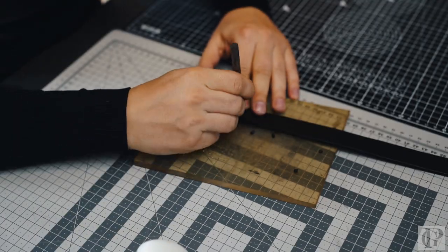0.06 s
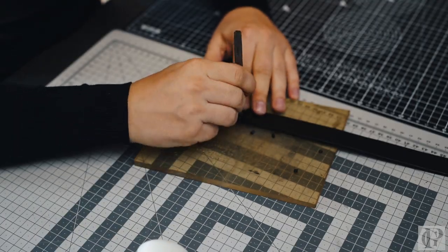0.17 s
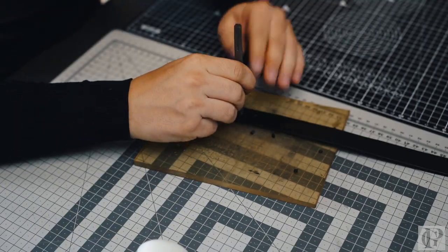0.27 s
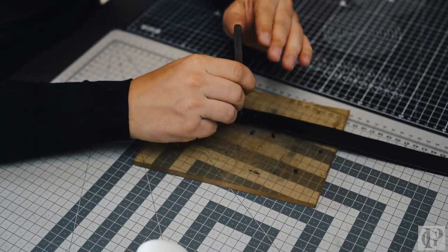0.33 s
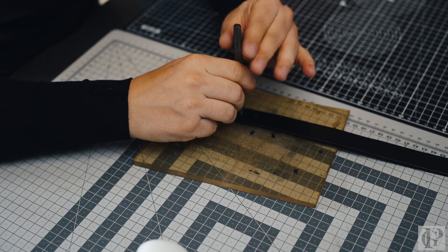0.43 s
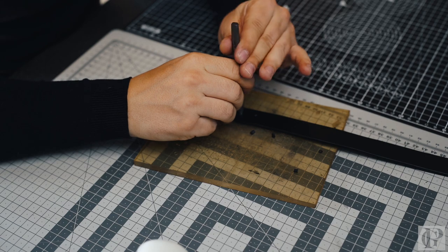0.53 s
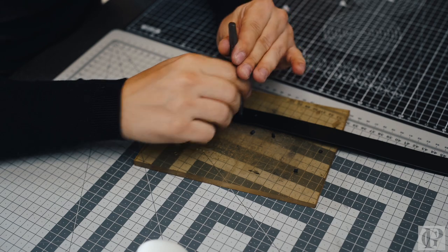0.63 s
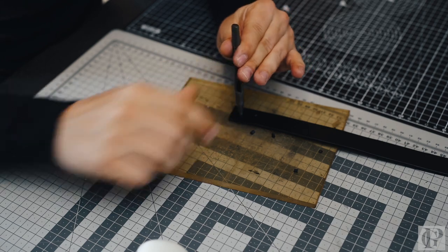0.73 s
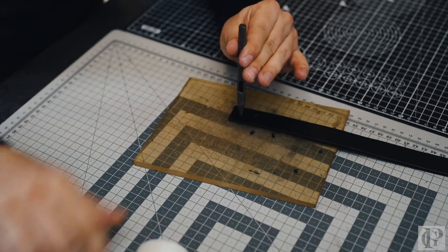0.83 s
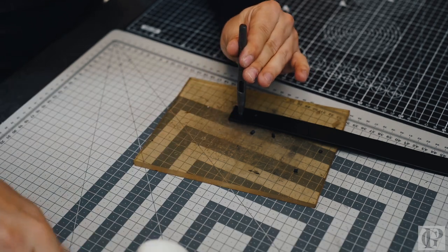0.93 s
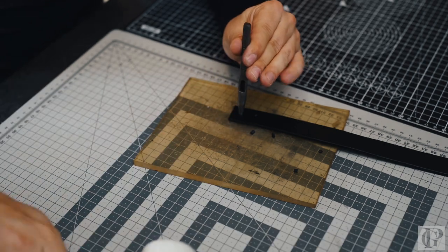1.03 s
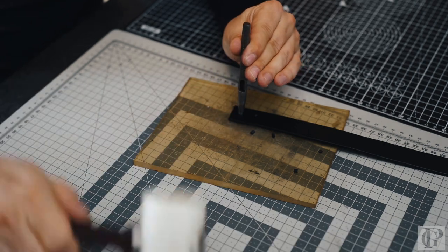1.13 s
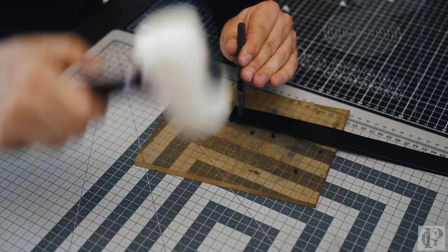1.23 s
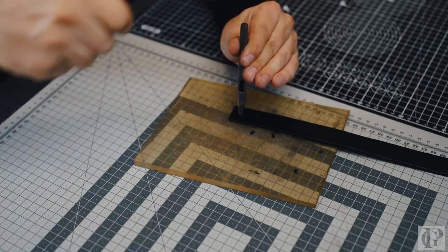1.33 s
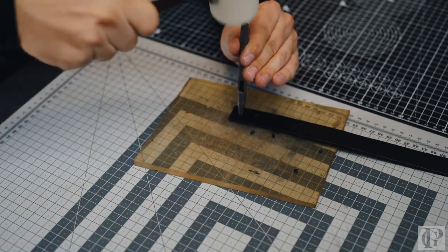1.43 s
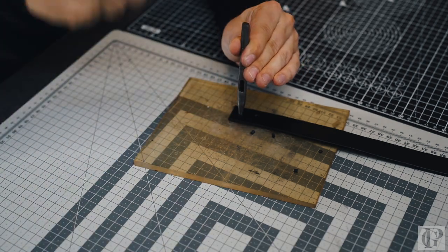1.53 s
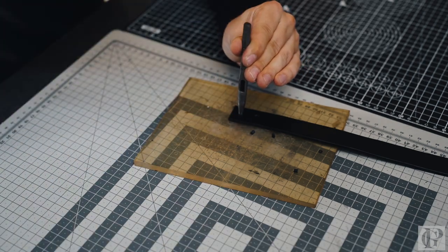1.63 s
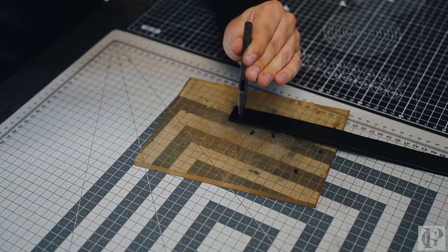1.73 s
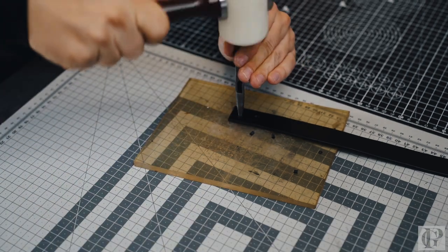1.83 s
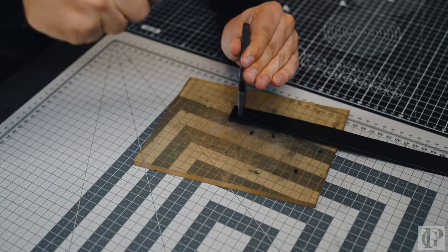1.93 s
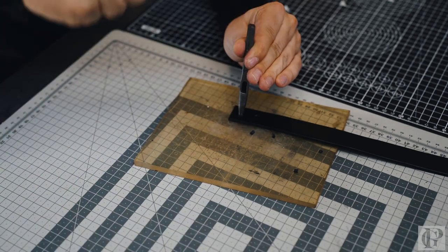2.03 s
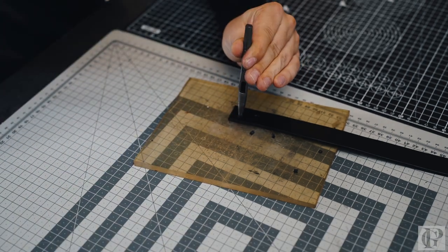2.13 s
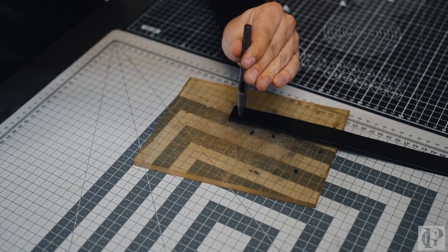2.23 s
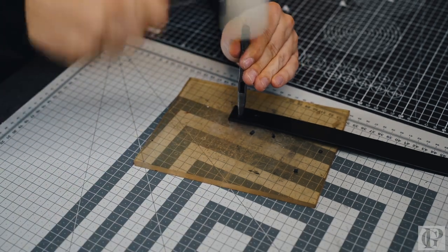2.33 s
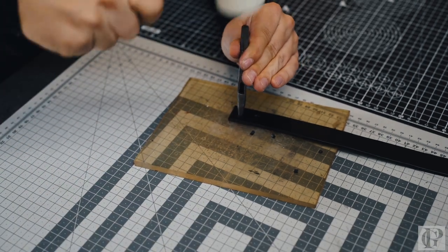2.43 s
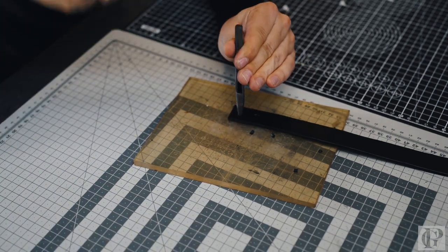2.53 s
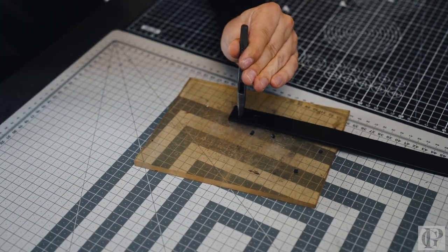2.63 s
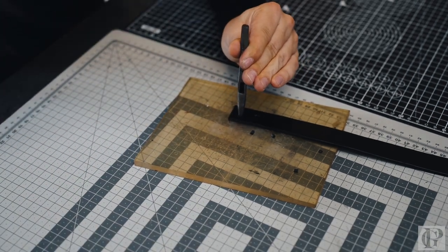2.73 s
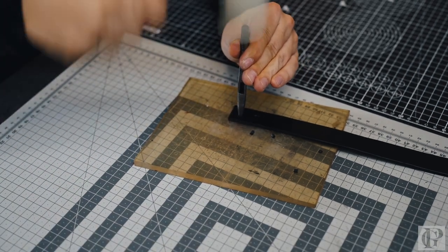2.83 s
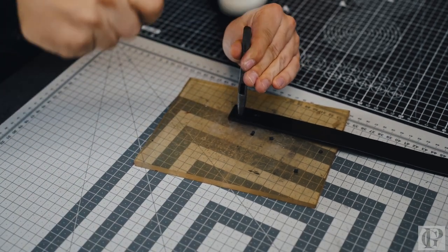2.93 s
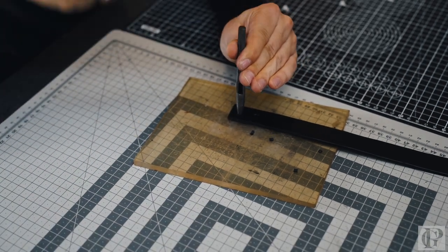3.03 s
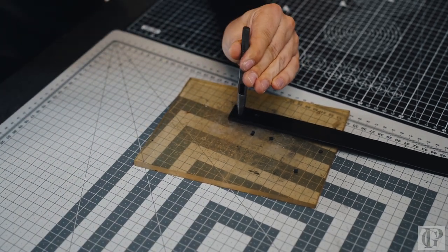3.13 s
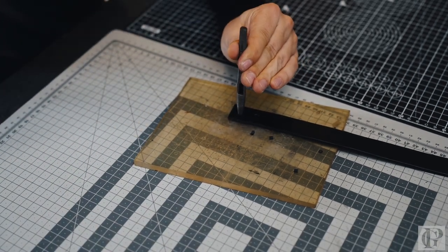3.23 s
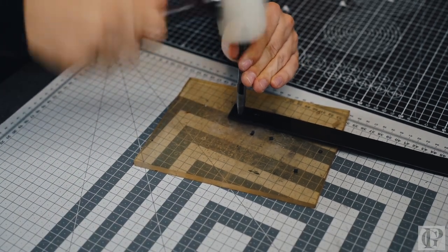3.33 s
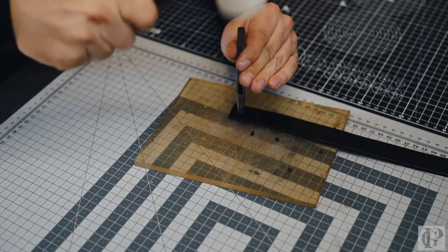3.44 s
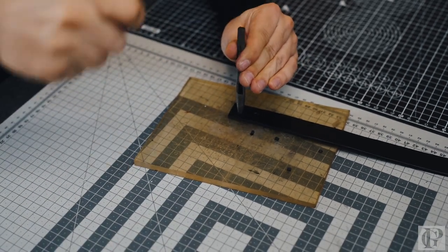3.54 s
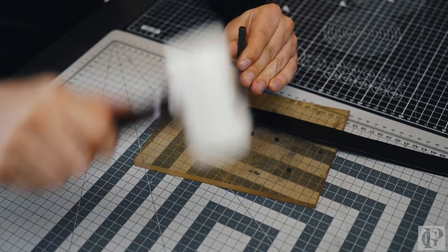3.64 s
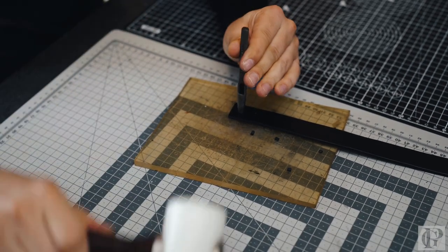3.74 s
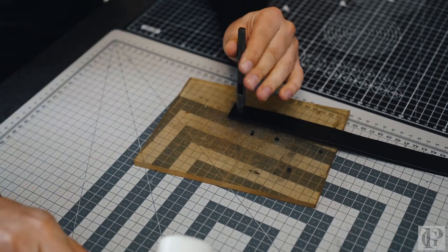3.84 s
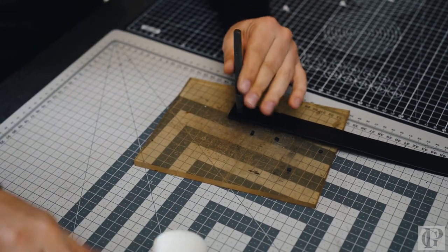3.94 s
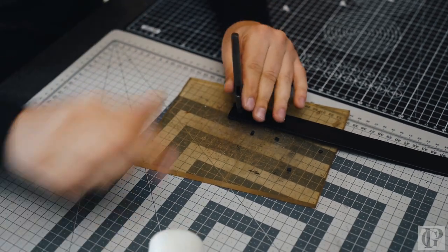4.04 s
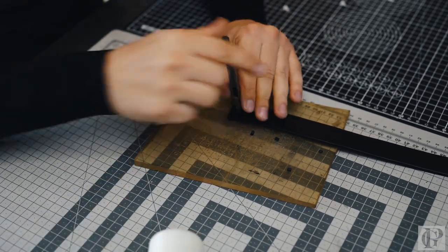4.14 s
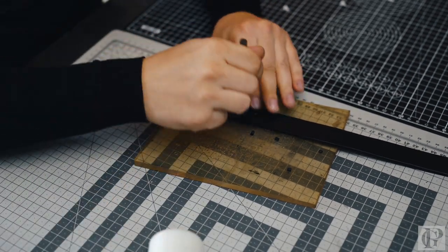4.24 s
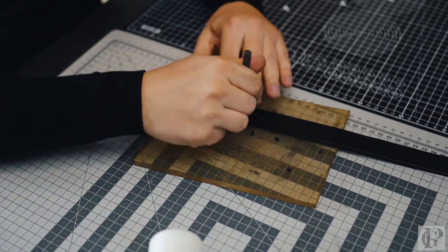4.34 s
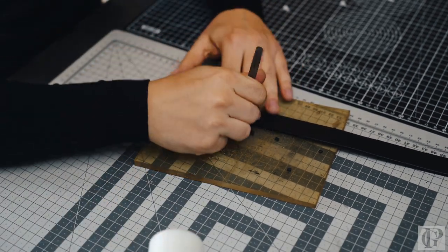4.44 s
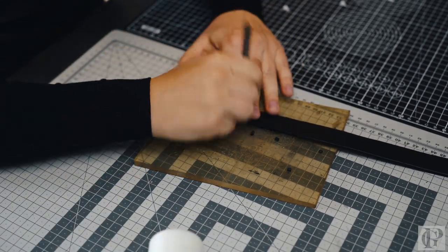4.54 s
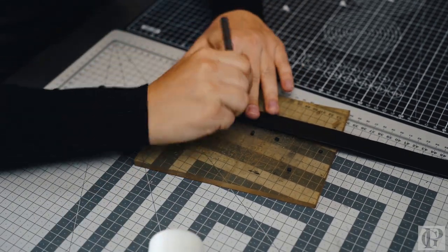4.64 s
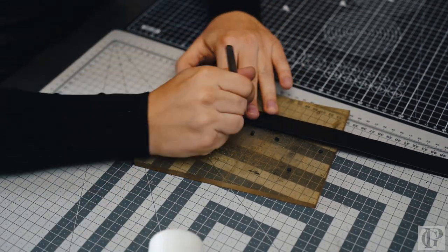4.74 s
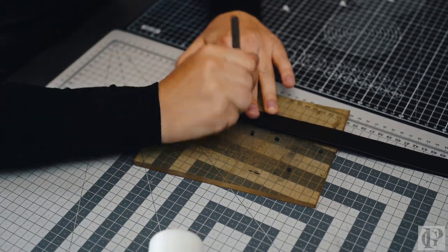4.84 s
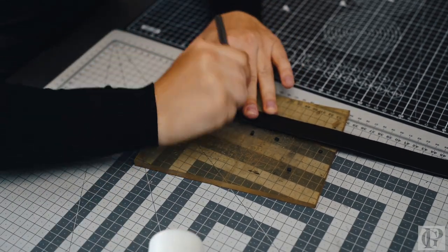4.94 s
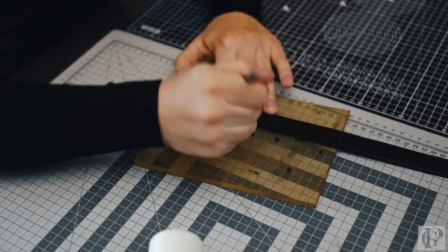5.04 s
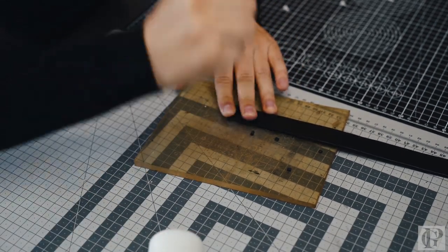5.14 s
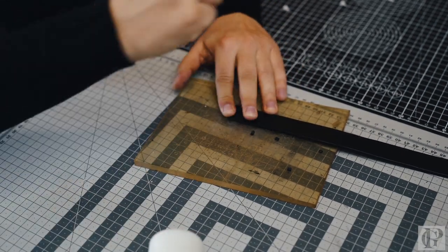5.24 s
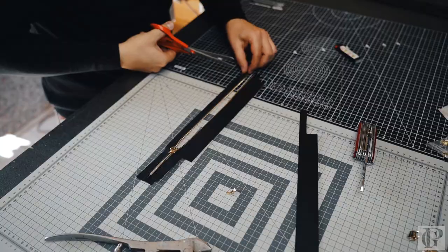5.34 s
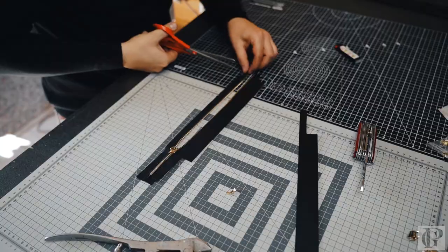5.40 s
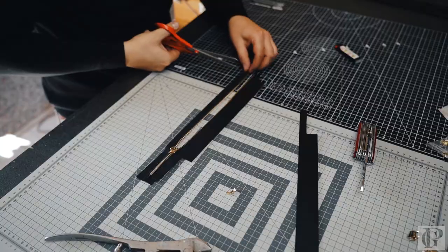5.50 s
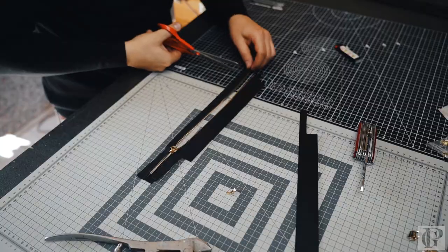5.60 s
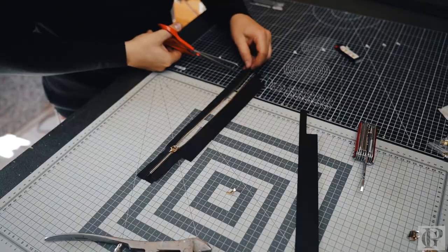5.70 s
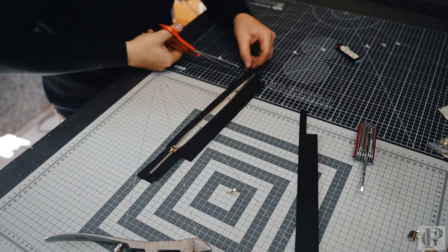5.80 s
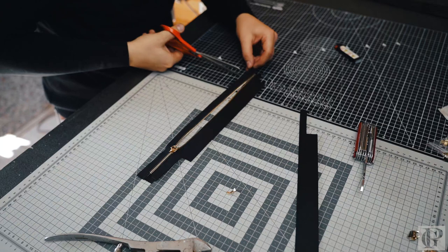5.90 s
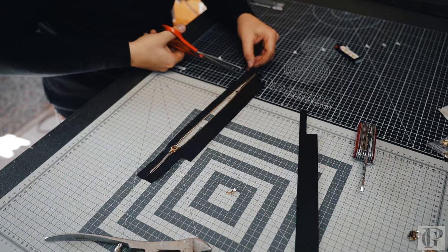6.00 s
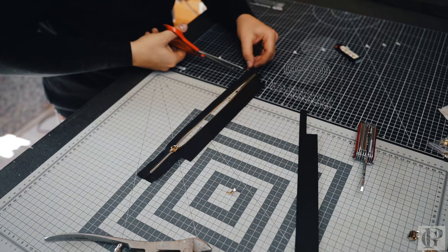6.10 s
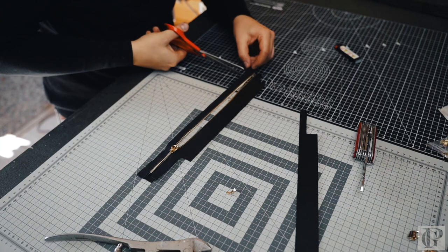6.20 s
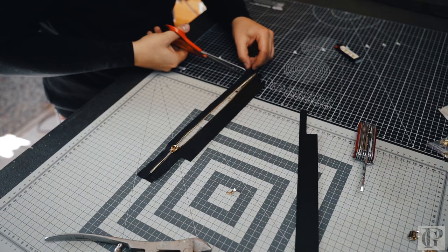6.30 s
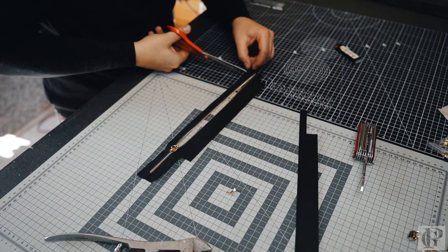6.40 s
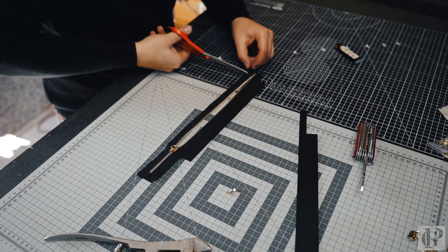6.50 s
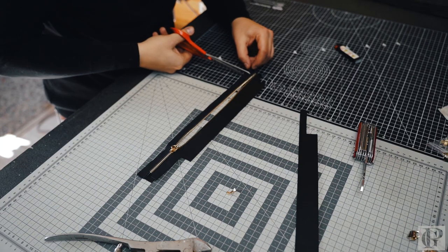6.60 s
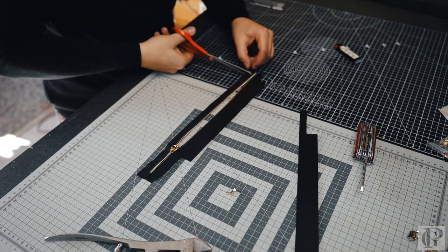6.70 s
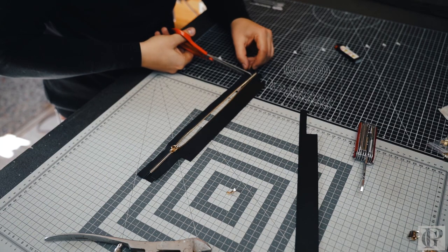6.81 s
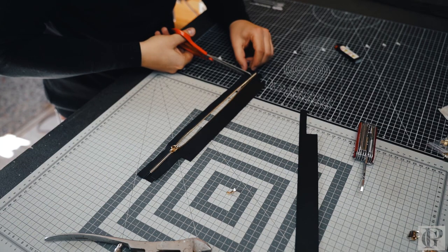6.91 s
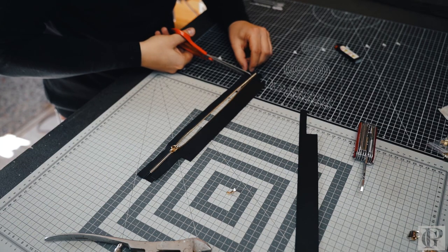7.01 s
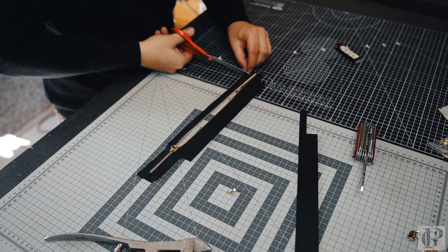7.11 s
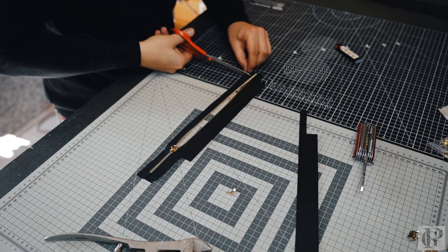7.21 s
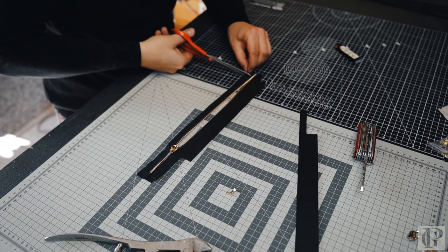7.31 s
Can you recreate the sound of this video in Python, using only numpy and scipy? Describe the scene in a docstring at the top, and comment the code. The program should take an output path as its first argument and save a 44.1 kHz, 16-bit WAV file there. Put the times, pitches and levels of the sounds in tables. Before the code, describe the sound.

In a bare, echoing room with a faint hum, light handling ticks lead into four loud, evenly spaced blows of a plastic mallet on a steel punch going through leather. Each sharp clack shakes the bench near the microphone, and the room swells behind it. The mallet is put down with a quick clatter, then the punch with a clink. The background drops, and scissors give one quiet snip among faint blade ticks.

```python
"""Leatherwork in a bare, echoing room. Over soft room noise, fingers brush leather and pick up a mallet. Four
blows of the plastic mallet drive a steel hole punch through the leather and shake the workbench. A limiter
squashes each crack and lets go quickly, so the room swells up behind every blow; its last few dB come back
slowly. The mallet is put down with a clatter, then the punch. The scene changes: over quieter room noise,
scissors tick and snip quietly."""
import sys
import numpy as np
from scipy import signal
from scipy.fft import rfft, irfft
from scipy.io import wavfile
from scipy.ndimage import uniform_filter1d, minimum_filter1d

SR = 44100
rng = np.random.default_rng(int(sys.argv[2]) if len(sys.argv) > 2 else 0)


def dump_mix(stems):
    """Bounce the given channels to the path in sys.argv[1] as a 16-bit WAV at rate SR."""
    frames = np.atleast_2d(stems).T  # one column per channel
    limited = np.clip(frames, -1, 1)  # hard clip at full scale
    pcm = np.round(limited * 32767).astype(np.int16)
    wavfile.write(sys.argv[1], SR, pcm)


N = 324540
TIME = np.arange(N) / SR
TAPS = 4096  # samples in a contact pulse or an echo
TAP_HZ = np.fft.rfftfreq(TAPS, 1 / SR)


def amp(db):
    """Decibels to gain."""
    return 10 ** (np.asarray(db) / 20)


def pan(right_db):
    """Left and right gains, right_db apart."""
    return amp(right_db * np.array([[-.5], [.5]]))


def unit_rms(x):
    """Scales to rms 1."""
    return x / np.sqrt(np.mean(x ** 2) + 1e-20)


def curve(points, hz):
    """Reads a table on a log-frequency axis."""
    f, value = np.transpose(points)
    return np.interp(np.log(hz + 1), np.log(f + 1), value)


def add(track, s, sound):
    """Mixes a sound in at time s."""
    part = track[round(s * SR):][:len(sound)]
    part += sound[:len(part)]


def through(x, response):
    """Convolves along time and keeps N samples."""
    return signal.fftconvolve(np.atleast_2d(x), np.atleast_2d(response), axes=1)[:, :N]


def diffuse(size):
    """Stereo noise arriving from all sides: alike in the bass, wide in the treble."""
    # Likeness of left and right: f/Hz, correlation
    likeness = [(120, 1), (250, 0.98), (500, .82), (1000, 0.59), (2000, .42), (4000, -0.15), (15000, -0.17)]
    mid, side = rfft(rng.standard_normal((2, size)))
    alike = np.clip(curve(likeness, np.fft.rfftfreq(size, 1 / SR)), -1, 1)
    mid, side = mid * np.sqrt((1 + alike) / 2), side * np.sqrt((1 - alike) / 2)
    return irfft(np.array([mid + side, mid - side]), size)


def hiss(tone):
    """Steady diffuse noise of a given colour, at rms 1."""
    colour = amp(curve(tone, np.fft.rfftfreq(N, 1 / SR)))
    return unit_rms(irfft(rfft(diffuse(N)) * colour, N))


def air(tone, db):
    """The room's soft steady noise."""
    return hiss(tone) * amp(db) * pan(1.0)


def hum(waver_hz=0.76):
    """Faint low tones, each wavering in pitch."""
    # Hum tones: f/Hz, level/dB
    tones = [(113, -71), (167, -78), (280, -74)]
    drifts = waver_hz * unit_rms(uniform_filter1d(rng.standard_normal((len(tones), N)), size=8000))
    return sum(amp(db) * np.sqrt(2) * np.sin(2 * np.pi * np.cumsum(hz + drift) / SR)
               for (hz, db), drift in zip(tones, drifts))


def room(build_s=0.029, scatter_s=0.006):
    """The room's response: scattered near echoes, then a dense tail that builds and dies band by band."""
    # Reverb time: f/Hz, t60/s
    decay = [(80, 0.45), (300, 0.37), (1000, 0.5), (2500, 0.49), (5000, 0.5), (9000, 0.45), (15000, 0.36)]
    # Echoes off the nearest surfaces: delay/s, level/dB
    echoes = [(.0037, -7), (.009, -13.5), (.016, -20), (.029, -10.5)]
    hz, t, bands = signal.stft(diffuse(SR), SR, nperseg=256)
    fade = 1000 ** (-t / curve(decay, hz)[:, None])
    tail = signal.istft(bands * fade, SR, nperseg=256)[1][:, :SR]
    tail *= 1 - np.exp(-(TIME[:SR] / build_s) ** 2)
    tail /= np.sqrt((tail ** 2).sum(1).mean())
    for delay, db in echoes:
        scatter = diffuse(TAPS) * np.exp(-TIME[:TAPS] / scatter_s)
        for ear, echo in zip(tail, scatter):
            add(ear, delay, amp(db) * echo / np.linalg.norm(echo))
    return tail * pan(0.3)


def rubbing(walls, grain_db=4):
    """Fingers and blades slide over leather in short strokes of grainy friction noise."""
    # Strokes: t/s, length/s, level/dB
    rubs = [(0.217, 0.23, -74.5), (0.65, 0.089, -74), (0.963, 0.074, -68), (4.95, 0.024, -62),
            (5.788, 0.057, -75.5)]
    # Friction colour: f/Hz, level/dB
    tone = [(300, -8), (2200, 7), (6000, -1), (15000, -1.5)]
    strokes = np.zeros(N)
    for s, length, db in rubs:
        add(strokes, s, amp(db) * np.hanning(round(length * SR)))
    roughness = unit_rms(uniform_filter1d(rng.standard_normal(N), size=130))
    grains = unit_rms(amp(grain_db * roughness))
    rub = hiss(tone) * grains * strokes
    return rub + amp(0.5) * through(rub, walls)


def click(db):
    """The sharpest causal pulse that has this spectrum."""
    log_gain = np.log(amp(np.r_[db, db[-2:0:-1]]))
    return np.fft.ifft(np.exp(np.conj(signal.hilbert(log_gain)))).real


def ring(modes):
    """A struck body: decaying sines of alternating sign, each level setting a spectral peak."""
    t = TIME[:SR]
    out = np.zeros(SR)
    for k, (hz, db, t60) in enumerate(modes):
        damping = np.log(1000) / t60
        strength = (-1) ** k * amp(db) * 2 * damping / SR
        out += strength * np.exp(-damping * t) * np.sin(2 * np.pi * hz * t)
    return out


def crunch(grit_db, decay_s, low_cut_hz):
    """A contact pulse with grit behind it: smeared over a few ms, yet of even spectrum."""
    bright_noise = irfft(rfft(rng.standard_normal(TAPS)) * TAP_HZ / np.hypot(TAP_HZ, low_cut_hz))
    grit = bright_noise * np.exp(-TIME[:TAPS] / decay_s)
    force = 1 + amp(grit_db) * rfft(grit) / np.linalg.norm(grit)
    colour = rfft(click(20 * np.log10(abs(force) + 1e-6)))
    return irfft(force / colour)


def dispersed(x):
    """Bending waves are slower in the bass, so a pulse leaves the bench as a short falling chirp."""
    lag_s = .0012 / (1 + np.fft.rfftfreq(N, 1 / SR) / 2500)
    return irfft(rfft(x) * np.exp(-2j * np.pi * np.cumsum(lag_s) * SR / N), N)


def knocks(rows, tone, modes, treble_hz, crunch_db, crunch_s, sway_db, crunch_hz=500, spot_octaves=0.24):
    """Each contact clicks, rings the tool and shakes the bench. Returns tool sound and bench thud."""
    # Modes of the bench, and its rocking on its legs: f/Hz, level/dB, t60/s
    bench = [(82, -2, .35), (104, -3, .35), (133, 2, .3), (146, 11, .36), (168, 2, .33), (195, -1, .33),
             (243, 7, .28), (285, 6, .16), (325, 6, .16), (365, 6, .2), (395, 7, .22), (440, 2, .33),
             (514, -3, .3)]
    sway = [(41, 3.3, 1)]
    shelf = 1 - 1 / (1 + (TAP_HZ / treble_hz) ** 2) ** 2
    tool, thud = np.zeros(N), np.zeros(N)
    tool_ring = ring(modes)
    bench_ring = ring(bench) + amp(sway_db) * ring(sway)
    # Thud, treble and ring are relative to the level; the spot is the struck place's broad resonance.
    for s, db, thud_db, treble_db, ring_db, spot_hz, spot_db in rows:
        force = crunch(crunch_db, crunch_s, crunch_hz)
        spot = np.exp(-(np.log2((TAP_HZ + 1) / spot_hz) / spot_octaves) ** 2)
        sound = amp(ring_db) * tool_ring
        add(sound, 0, click(curve(tone, TAP_HZ) + treble_db * shelf + spot_db * spot))
        add(tool, s, amp(db) * signal.fftconvolve(sound, force))
        add(thud, s, amp(db + thud_db) * bench_ring)
    return dispersed(tool), thud


def placed(tool, thud, walls, direct_db, right_db):
    """The direct sound, a little off centre, with the room's answer and the bench underneath."""
    return tool * amp(direct_db) * pan(right_db) + through(tool, walls) + thud


def light_touches(ticks, gain_db, thud_db, ring_db, spot_db, even_hz=2500, thin_db_per_octave=0):
    """Knock rows for light ticks. On thin blades, the higher ones have less body under their treble."""
    rows = []
    for s, db, hz in ticks:
        thin_db = thin_db_per_octave * np.log2(hz / even_hz)
        rows.append((s, db + gain_db - thin_db, thud_db, thin_db, ring_db, hz, spot_db))
    return rows


def scissors(walls):
    """The blades tick against each other and close in one snip."""
    # Blade ticks: t/s, level/dB, f/Hz
    blade_ticks = [(5.8194, -61.5, 4460), (5.8433, -50, 5700), (6.2494, -63, 4580), (6.8074, -59, 9610),
                   (7.1347, -57, 5560), (7.2554, -55.5, 7130)]
    # The snip: t/s, level/dB, thud/dB, treble/dB, ring/dB, spot/Hz, spot lift/dB
    snip = [(5.919, -11, -7, -11, -3, 2540, 2)]
    # Contact colour: f/Hz, level/dB
    tone = [(80, -11), (300, 4), (650, -9.5), (1300, -6), (2700, -10), (4500, -10.5), (9000, -20),
            (16000, -24)]
    # Blade modes: f/Hz, level/dB, t60/s
    blades = [(1246, -11, 0.044), (1920, 0.5, 0.033), (2680, -7, 0.023)]
    ticks = light_touches(blade_ticks, gain_db=25.5, thud_db=-7, ring_db=-7, spot_db=5.5,
                          thin_db_per_octave=18)
    sound = knocks(snip + ticks, tone, blades, treble_hz=3060, crunch_db=7.5, crunch_s=0.0087, sway_db=-22)
    return amp(-3.5) * placed(*sound, walls, direct_db=2.5, right_db=5.0)


def handling(walls):
    """The mallet knocks as it is picked up; the punch ticks as it shifts in the fingers."""
    # Mallet pick-up: t/s, level/dB, thud/dB, treble/dB, ring/dB, spot/Hz, spot lift/dB
    pick_up = [(0.999, -19, 16.4, -6, -4, 169, 38), (1.0565, -18, 11, 9, 25, 6700, 6.8)]
    # Punch ticks: t/s, level/dB, f/Hz
    punch_ticks = [(1.2793, -49, 3540), (1.3524, -55.5, 4000), (4.6444, -52, 1860), (4.9393, -47.5, 2140),
                   (5.3614, -54.5, 1940)]
    # Contact colour: f/Hz, level/dB
    tone = [(80, 2.5), (350, -24.5), (600, -1), (1500, -2), (5000, -8), (7000, -12.5), (9000, -11.5),
            (11000, -19), (16000, -23)]
    # Tool steel modes: f/Hz, level/dB, t60/s
    steel = [(2780, -14, .04), (4030, -20, .03), (6230, -16, .025), (7330, -20, .02)]
    ticks = light_touches(punch_ticks, gain_db=18, thud_db=0, ring_db=8, spot_db=8.5)
    sound = knocks(pick_up + ticks, tone, steel, treble_hz=1510, crunch_db=9, crunch_s=0.013, sway_db=-13)
    return placed(*sound, walls, direct_db=2.5, right_db=5.5)


def punch_set_down(walls):
    """The punch lands with a clink of its shank and rocks the bench."""
    # Landing: t/s, level/dB, thud/dB, treble/dB, ring/dB, spot/Hz, spot lift/dB
    landing = [(5.0655, 3.7, -1.3, 0, 0, 5800, 3.2)]
    # Contact colour: f/Hz, level/dB
    tone = [(40, -5), (110, 3.5), (300, -18.5), (500, -11), (800, -8.5), (1800, -16.5), (3200, -32),
            (4200, -25.5), (5000, -19), (6500, -18.5), (8500, -30.5), (16000, -29.5)]
    # Shank modes: f/Hz, level/dB, t60/s
    shank = [(5200, -21, .04), (6200, -12.5, 0.036)]
    sound = knocks(landing, tone, shank, treble_hz=1500, crunch_db=8, crunch_s=0.007, sway_db=17.5)
    return placed(*sound, walls, direct_db=1, right_db=5.0)


def mallet_clatter(walls, spot_db=8, soft_hz=1200, rebound_s=0.0058, dull_db=-13):
    """The mallet lands head first, then on its handle. Soft, low contacts shake the bench most."""
    # Landings: t/s, level/dB, treble/dB, ring/dB, f/Hz
    landings = [(3.9068, 32, -13, -14, 725), (3.9345, 23.5, -10.5, -17, 825), (3.9797, 32, 3.5, -14, 1940),
                (4.0102, 17.5, 3, -17, 2300), (4.0418, 37.5, -2.5, -3.5, 3496)]
    # Contact colour: f/Hz, level/dB
    tone = [(50, -28), (150, -17), (400, -10.5), (620, -5.5), (1150, -4), (1800, -9), (2600, -16),
            (4200, -24.5), (6500, -30.5), (16000, -43.5)]
    # Mallet modes: f/Hz, level/dB, t60/s
    modes = [(1125, -4, 0.14), (1800, -11.5, 0.053), (3348, -7, 0.024), (3717, -19, 0.022),
             (4880, -18, 0.036)]
    rows = []
    for s, db, treble_db, ring_db, hz in landings:
        thud_db = -10 - 3 * np.log2(hz / soft_hz)
        rows.append((s, db, thud_db, treble_db, ring_db, hz, spot_db))
        if hz < soft_hz:  # soft contacts touch twice, the second time duller
            dulled = (thud_db + dull_db, treble_db + dull_db, ring_db + dull_db)
            rows.append((s + rebound_s, db + 1, *dulled, hz, spot_db))
    sound = knocks(rows, tone, modes, treble_hz=1703, sway_db=-27.5,
                   crunch_db=8, crunch_s=0.0034, crunch_hz=1500)
    return placed(*sound, walls, direct_db=-1.5, right_db=0.5)


def mallet_blows(walls, right_db=2.5, cut_s=0.0004):
    """The mallet hits the punch; once its edge is through the leather and on the board, it clacks."""
    # Blows: t/s, level/dB, thud/dB, treble/dB, ring/dB, spot/Hz, spot lift/dB
    blows = [(1.8677, 40.5, 0.5, -2, -33.5, 4430, 5), (2.4191, 43, 1, -2, -4.5, 2400, 0),
             (2.9209, 42, -1, 0, -5, 2300, 0), (3.4159, 44, 1, -3, -7, 3400, 7.5)]
    # Contact colour, and the direct sound against what enters the room: f/Hz, level/dB
    tone = [(40, -25.5), (80, -11), (140, -3), (260, 1.5), (420, 2), (650, -3), (1200, -2), (1650, -1),
            (2100, -0.5), (2650, -1.5), (3050, -14), (4500, -17), (6500, -22.5), (10000, -33.5),
            (16000, -39.5)]
    beam = [(100, 3), (300, -1), (650, -17), (1000, -14), (1600, -5.5), (2050, -4), (2700, -2.5),
            (4300, -6.5), (6000, -8.5), (15000, 0)]
    # Punch modes, and its shank bending, beamed sideways at the microphone: f/Hz, level/dB, t60/s
    modes = [(1197, 1, .04), (2720, -13, .02), (4370, -23.5, .02)]
    clack = [(1980, 13, 0.0062), (2120, 13, .0055), (4300, -8, 0.005)]
    tool, thud = knocks(blows, tone, modes, treble_hz=1400, sway_db=-4,
                        crunch_db=9, crunch_s=0.0023, crunch_hz=7050)
    direct = through(tool, click(curve(beam, TAP_HZ)))[0]
    for s, db, _, _, ring_db, _, _ in blows:
        add(direct, s + cut_s, amp(db + ring_db) * ring(clack))
    return direct * pan(right_db) + through(tool, walls) + thud


def scene(switch_s=5.377):
    """Punching, then a quick crossfade to scissors over quieter air, in the same room."""
    # Room noise colour under each job: f/Hz, level/dB
    punching_air = [(25, -17.5), (50, -21.5), (80, 1), (110, -2), (170, -6), (220, -12), (280, 2.5),
                    (350, 1), (500, -13.5), (800, -9.5), (1100, -16), (2000, -29), (3300, -40.5),
                    (8000, -61.5)]
    cutting_air = [(25, -42), (60, -8), (105, -13.5), (135, -4), (190, -11), (255, -1), (360, -4),
                   (560, -15), (850, -18), (1400, -26.5), (2500, -36), (8000, -73)]
    walls = room()
    tools = mallet_blows(walls) + mallet_clatter(walls) + handling(walls) + punch_set_down(walls)
    punching = tools + air(punching_air, db=-56.5) + hum()
    cutting = scissors(walls) + air(cutting_air, db=-68.5)
    fade = uniform_filter1d((TIME > switch_s) * 1., size=128)
    return (1 - fade) * punching + fade * cutting + rubbing(walls)


def held(over_db, db_per_s):
    """Follows each peak at once and sinks back at a steady rate."""
    recovery = TIME * db_per_s
    return np.maximum.accumulate(over_db + recovery) - recovery


def record(dry, ceiling_db=-5.5, linger_db=9.0, hiss_db=-81.5, low_pass_hz=16200):
    """Microphone hiss, a peak limiter that recovers quickly but for its last few dB, then a low-pass."""
    # Microphone hiss colour: f/Hz, level/dB
    mic_tone = [(100, -9), (3000, 1.5), (5000, 2), (7000, -1.5), (10500, 1), (13000, -10.5), (16000, -16)]
    x = dry + amp(hiss_db) * hiss(mic_tone)
    over_db = np.maximum(20 * np.log10(abs(x).max(0) + 1e-9) - ceiling_db, 0)
    fast_db = held(over_db, db_per_s=125)
    slow_db = held(np.minimum(over_db, linger_db), db_per_s=5.5)
    gain_db = -np.maximum(fast_db, slow_db)
    gain_db = uniform_filter1d(minimum_filter1d(gain_db, size=65), size=65)  # duck just ahead of a peak
    low_pass = signal.firwin(511, low_pass_hz, window=("kaiser", 9), fs=SR)
    return signal.oaconvolve(x * amp(gain_db), low_pass[None], "same", axes=1)


dry = scene()
out = record(dry)
dump_mix(out)
```